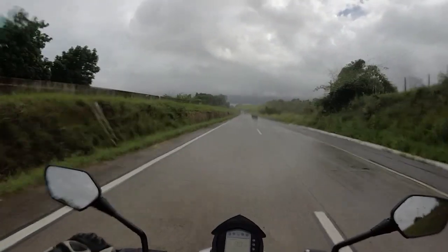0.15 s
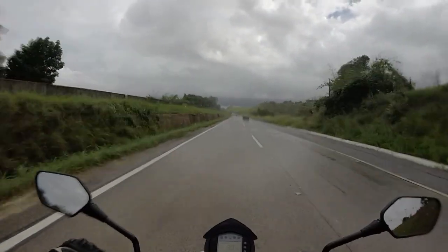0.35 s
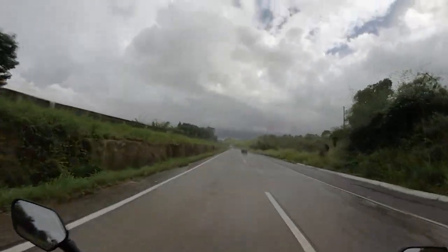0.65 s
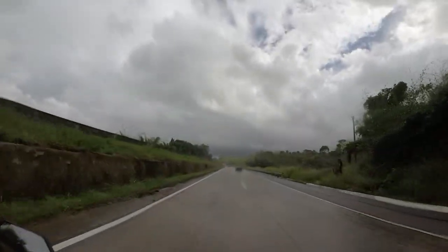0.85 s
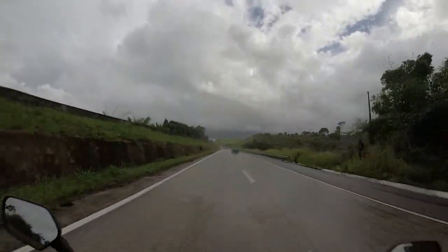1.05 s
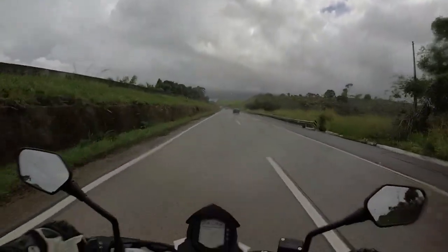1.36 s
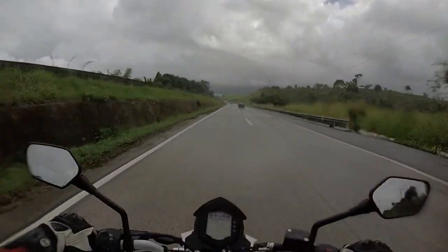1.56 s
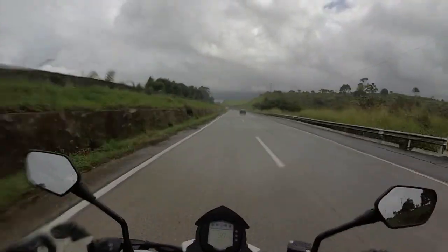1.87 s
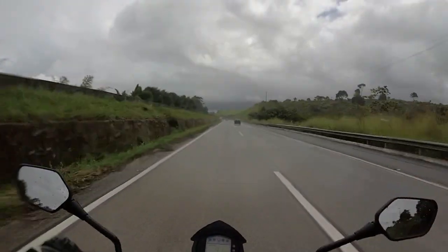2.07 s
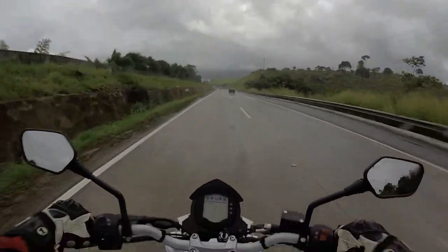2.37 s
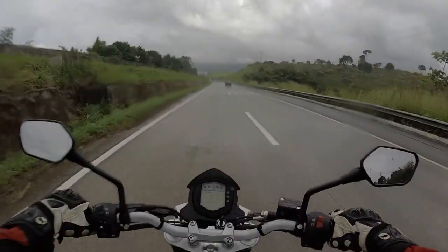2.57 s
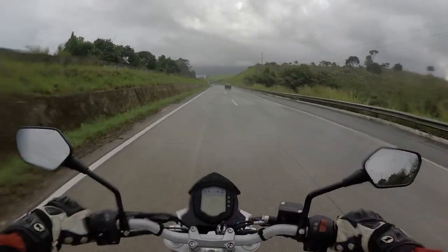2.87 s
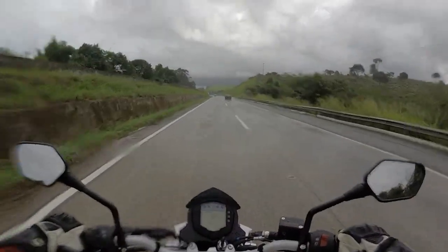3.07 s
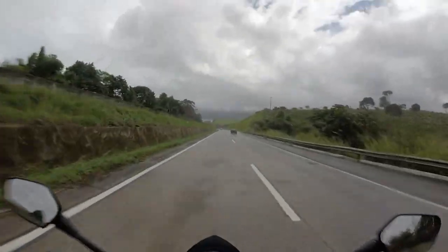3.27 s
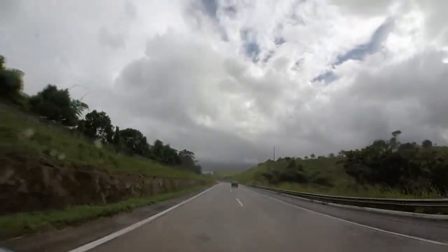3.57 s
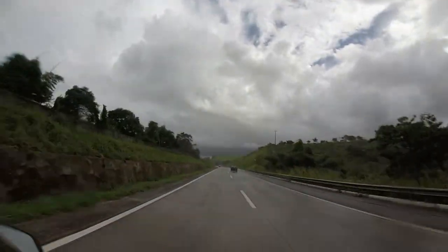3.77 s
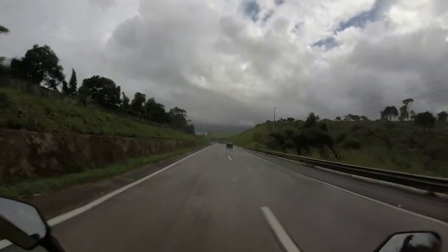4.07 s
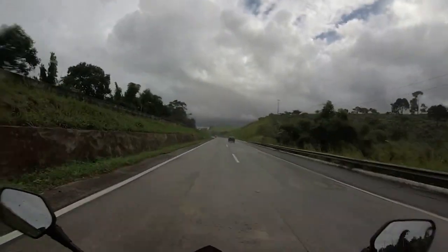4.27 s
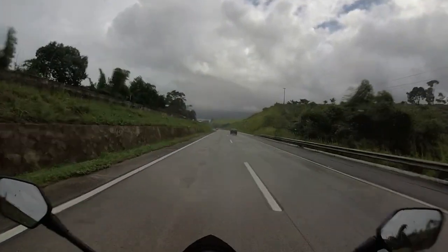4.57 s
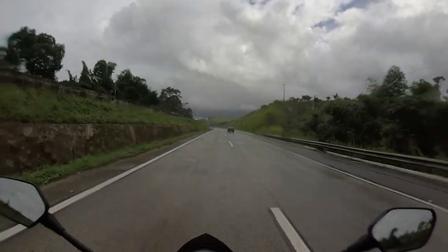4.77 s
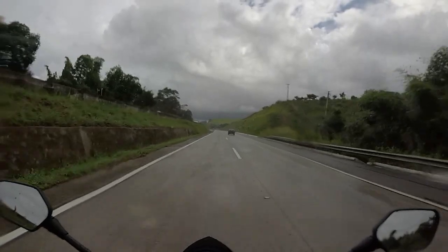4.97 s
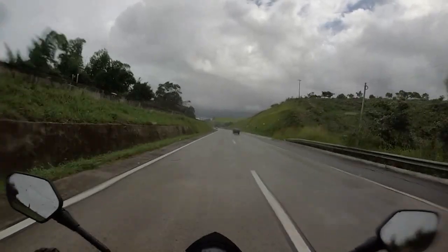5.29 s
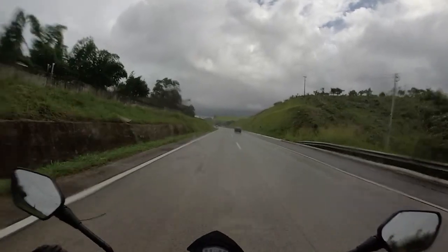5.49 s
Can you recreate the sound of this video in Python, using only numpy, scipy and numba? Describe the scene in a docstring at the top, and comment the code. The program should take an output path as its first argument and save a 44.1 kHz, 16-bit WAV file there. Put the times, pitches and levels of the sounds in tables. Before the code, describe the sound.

On an open road in rain, a helmet-mounted microphone inside a plastic shell catches irregular clicks, tiny splashes and occasional blunt knocks. Wind buffets in low, uneven gusts with a muffled hiss, while a very faint, wavering mid-pitched engine whine stays behind. The pattering continues to the end, with loud peaks briefly ducking everything.

```python
"""On a fast road in the rain, a camera in a plastic case rides on a motorcyclist's helmet.
Raindrops tick on the case and set its modes ringing; the hardest ones add a dull thump.
Wind makes a low rumble of shaped noise and a muffled hiss by shaking the same modes.
A faint engine whine is a wavering sine, and a limiter ducks the sound after loud peaks."""
import sys
import numpy as np
from scipy import signal
from scipy.fft import rfft, irfft, next_fast_len
from scipy.io import wavfile
from scipy.ndimage import uniform_filter1d
from numba import njit

SR = 44100
rng = np.random.default_rng(int(sys.argv[2]) if len(sys.argv) > 2 else 0)


def unload_audio(sound):
    """Save the sound as a 16-bit wav file, at the path given as the first command line argument."""
    columns = np.transpose(np.atleast_2d(sound))
    # keep every value between -1 and 1, then stretch to whole-number steps
    steps = np.round(np.clip(columns, -1, 1) * 32767)
    wavfile.write(sys.argv[1], SR, steps.astype(np.int16))


N = 248283  # length in samples

# Strength of the wind over time: start_s, wind_db
WIND_GUSTS = [(0.0, -33), (0.25, -39.5), (0.5, -36.5), (0.77, -40), (1.02, -35), (1.3, -30.5),
              (1.44, -36.5), (1.77, -40), (1.98, -36), (2.25, -41), (2.42, -30.5), (2.59, -32.5),
              (2.8, -44), (2.98, -32.5), (3.38, -26.5), (3.74, -40), (4.09, -39), (4.37, -31.5),
              (4.83, -37.5), (5.1, -33), (5.63, -35.5)]
# Tone of the wind rumble, relative levels: pitch_hz, level_db (per Hz)
RUMBLE_TONE = [(12, -38), (24, -3), (40, -5), (60, -8), (119, 2.5), (224, -10.5), (368, -22), (527, -19),
               (574, -16), (837, -26.5), (1200, -39.5), (1560, -29), (2640, -120)]
# Knocks from the few drops that jolt the whole camera: start_s, level_db
CAMERA_THUDS = [(1.396, -10), (1.587, -22), (2.623, -9), (3.468, -17), (3.5985, -15), (4.2388, -10),
                (4.6528, -21), (4.7971, -23)]
# Large raindrops; the pitch stands for where a drop lands, which decides the modes that ring most:
# start_s, level_db, pitch_hz
LARGE_DROPS = [(0.0314, -7.5, 4500), (0.04, -4.5, 4300), (0.0513, -2, 4060), (0.2009, -11.5, 2620),
               (0.2329, -7, 5620), (0.2778, -17.5, 4430), (0.3468, -12.5, 2260), (0.3905, -6.5, 5650),
               (0.4845, -8, 2900), (0.5217, -13, 4240), (0.5653, -12.5, 6700), (0.618, -7, 4380),
               (0.6357, -5.5, 4320), (0.6934, -17, 5900), (0.7117, -15.5, 6600), (0.7711, -8, 1780),
               (0.791, -8.5, 5530), (0.8044, -12.5, 4270), (0.8297, -18, 1790), (0.8341, -13, 4540),
               (0.8723, -16.5, 5640), (0.8877, -14, 1900), (0.9175, -13, 4240), (0.9979, -13.5, 4400),
               (1.0407, -12.5, 5800), (1.1615, -22.5, 1860), (1.177, -7.5, 5900), (1.2067, -16.5, 6040),
               (1.2233, -15.5, 2840), (1.2664, -18, 6480), (1.2831, -18, 1800), (1.294, -11.5, 2860),
               (1.3808, -15.5, 1840), (1.3955, -1, 4230), (1.4885, -15.5, 4320), (1.5026, -8, 4330),
               (1.511, -30, 7860), (1.5191, -13, 5500), (1.525, -8, 4400), (1.5437, -12, 6470),
               (1.6538, -17, 2780), (1.6666, -13, 4170), (1.6854, -7.5, 4280), (1.7546, -11, 5900),
               (1.7913, -12.5, 2800), (1.8095, -13.5, 5600), (1.8511, -17, 1750), (1.8787, -18, 3220),
               (1.9017, -6.5, 4280), (1.9487, -6.5, 1720), (2.0066, -7, 4300), (2.027, -9.5, 4300),
               (2.0841, -18.5, 5630), (2.3462, -5, 6540), (2.3704, -19.5, 4620), (2.3908, -20, 6560),
               (2.4495, -11.5, 3080), (2.4987, -17.5, 5770), (2.516, -15, 2870), (2.585, -16.5, 5860),
               (2.5975, -6, 3370), (2.6227, -2, 4330), (2.8061, -14.5, 6480), (2.9013, -15, 5930),
               (2.9363, -15, 4270), (3.0542, -11, 4250), (3.144, -17, 2240), (3.1639, -12, 3350),
               (3.2352, -12.5, 3180), (3.3017, -16, 5960), (3.3947, -2.5, 4320), (3.4683, -5, 1660),
               (3.5, -5.5, 4280), (3.5896, -13.5, 5800), (3.5986, -7.5, 4340), (3.6141, -15, 5860),
               (3.6367, -18, 1800), (3.6506, -14.5, 1780), (3.6717, -6, 2160), (3.6882, -15.5, 1810),
               (3.6996, -13, 6050), (3.7537, -10.5, 4260), (3.7854, -17, 4100), (3.8085, -12, 2310),
               (3.8235, -14, 1760), (3.8539, -11.5, 4300), (3.8931, -14, 4660), (4.0647, -22, 2840),
               (4.0945, -13.5, 5800), (4.0998, -10.5, 1690), (4.1294, -13, 6700), (4.1416, -16, 5000),
               (4.1676, -12, 1770), (4.2388, -11, 3150), (4.2437, -10.5, 2580), (4.3038, -13, 4230),
               (4.3161, -9.5, 1700), (4.3967, -7.5, 4620), (4.4078, -15, 1800), (4.4191, -2.5, 4370),
               (4.4493, -12.5, 4260), (4.4691, -10, 4460), (4.5017, -15, 6040), (4.5629, -7.5, 2860),
               (4.6319, -7, 5270), (4.6526, -6.5, 4320), (4.6947, -14.5, 1760), (4.7971, -5.5, 5570),
               (4.8117, -16, 3280), (4.8289, -12.5, 5530), (4.8713, -9, 4380), (4.9846, -10.5, 5840),
               (5.0075, -14, 5850), (5.0368, -12, 2200), (5.0521, -10.5, 4300), (5.2036, -15, 2730),
               (5.2138, -8, 2600), (5.2301, -15, 4100), (5.2362, -3, 4270), (5.2402, -6, 2290),
               (5.2536, -14, 5450), (5.2608, -13, 5400), (5.2708, -5.5, 4150), (5.2847, -14, 5300),
               (5.3812, -19, 2840), (5.3895, -13, 1810), (5.4237, -10.5, 5670), (5.4274, -10.5, 5800)]
# Modes of the plastic case, with ring time down to -60 dB and relative levels:
# pitch_hz, ring_s, drop_level_db, wind_level_db
CASE_MODES = [(1420, 0.017, -5.5, 2.5), (1874, 0.012, 1.5, 7), (2274, 0.017, -2.5, 1),
              (2900, 0.0088, 2, 6.5), (3220, 0.019, -8.5, -10), (3933, 0.0043, 5, -16),
              (4605, 0.0061, 3, -7.5), (5536, 0.0059, 1.5, -2.5), (5960, 0.011, -1.5, -7),
              (6460, 0.0027, 6, -11.5), (7980, 0.0056, -1.5, -24), (8730, 0.0051, 0.5, -19),
              (10500, 0.0027, 4.5, -21), (11700, 0.0037, 0.5, -32), (13200, 0.0026, 1, -20),
              (14600, 0.0055, -6.5, -34)]

CALM_DB = -35  # usual wind level, on the scale of the gust table
WHINE_HZ, WHINE_DB = 576, -59  # middle pitch and level of the engine whine
THUD_HZ, THUD_RING_S = 1000, 0.0022
SMALL_DROPS_PER_S = 180
TOP_HZ = 16400  # highest pitch that the recorder keeps


def undb(db):
    """Turn decibels into a plain multiplier."""
    return 10 ** (np.asarray(db) / 20)


def level(x, db):
    """Scale a sound so that its average (RMS) level is db."""
    return x * undb(db) / np.sqrt(np.mean(x ** 2))


def ring(x, hz, t60):
    """One mode struck or shaken by x: a sine that fades by 60 dB in t60 seconds."""
    pole = np.exp(2j * np.pi * hz / SR - np.log(1000) / (t60 * SR))
    return signal.lfilter([1], [1, -pole], x).imag


def walk(rate):
    """Smooth random wandering: rate new values a second, averaged twice, with a spread near 1."""
    hold = int(SR / rate)
    steps = np.repeat(rng.standard_normal(N // hold + 1), hold)
    smooth = uniform_filter1d(uniform_filter1d(steps, hold), hold)
    return 1.306 * smooth[:N]


def gust():
    """Wind strength in dB above its usual level, joined by straight lines between table points."""
    start_s, wind_db = np.transpose(WIND_GUSTS)
    return np.interp(np.arange(N) / SR, start_s, wind_db) - CALM_DB


def engine():
    """A thin gear whine: a sine whose pitch and level waver slightly."""
    pitch_hz = WHINE_HZ * (1 + 0.0058 * walk(4.7))
    phase = 2 * np.pi * np.cumsum(pitch_hz) / SR
    return np.sqrt(2) * undb(WHINE_DB + 0.71 * walk(5.8)) * np.sin(phase)


def rumble():
    """Turbulent air on the helmet: overlapping noise bands that swell together and flicker alone."""
    size = next_fast_len(N)
    hz = np.fft.rfftfreq(size, 1 / SR) + 1  # the 1 avoids the log of zero
    tone_hz, tone_db = np.transpose(RUMBLE_TONE)
    colour = undb(np.interp(np.log(hz), np.log(tone_hz), tone_db))
    out, swell = 0, walk(16)
    for centre in 16 * 2 ** (np.arange(14) / 2):  # Hz, half an octave apart
        band = np.cos(np.pi / 2 * np.clip(2 * np.log2(hz / centre), -1, 1))
        noise = irfft(rfft(rng.standard_normal(size)) * band * colour, size)[:N]
        share = np.clip(1.1 - 0.16 * np.log2(centre / 100), 0, 1)  # gusts move the bass most
        out = out + noise * undb(share * gust() + 0.5 * swell + 0.61 * walk(12))
    return level(out, -33.5)


def thuds():
    """A short, dull knock of the whole camera on its mount: one mode that dies at once."""
    start_s, level_db = np.transpose(CAMERA_THUDS)
    knocks = np.bincount((start_s * SR).astype(int), undb(level_db), N)
    return ring(knocks, THUD_HZ, THUD_RING_S)


def small_drops(low_db, top_db, low_hz, top_hz, driven):
    """Fine rain and spray landing at random on the case; gusts drive it harder."""
    when, size, place = rng.random((int(SMALL_DROPS_PER_S * N / SR), 3)).T
    level_db = low_db + (top_db - low_db) * size ** 1.75  # most drops are weak
    level_db = level_db + driven * gust()[(when * N).astype(int)]
    pitch_hz = low_hz * (top_hz / low_hz) ** place
    return np.column_stack([when * N / SR, level_db, pitch_hz])


def case(drops, splash_s, splash_db, scatter_db, far_db, over_db, under_db, octaves, count=4):
    """Each drop strikes, then splashes in weaker pats that ring the case; wind shakes the same modes."""
    start_s, level_db, pitch_hz = drops.T
    late = rng.random((len(drops), count)) * splash_s
    late[:, 0] = 0
    pats = rng.standard_normal((len(drops), count)) * undb(splash_db)
    pats[:, 0] = 1  # the first pat is the strike itself
    at = np.minimum(((start_s[:, None] + late) * SR).astype(int), N - 1).ravel()

    ticks, hiss, swell = 0, 0, walk(4.7)
    for k, (hz, t60, drop_db, wind_db) in enumerate(CASE_MODES):
        apart = np.log2(hz / pitch_hz)  # octaves from the drop's own pitch
        near = np.exp(-(apart / octaves) ** 2)
        slope = np.where(apart > 0, over_db, -under_db)  # dB per octave
        db = level_db + drop_db + slope * apart
        db = db + (1 - near) * (far_db + scatter_db * (rng.random(len(drops)) - 0.5))
        hits = np.bincount(at, (undb(db)[:, None] * pats).ravel(), N)
        # neighbouring modes start opposed, so the ring swells before it dies
        ticks = ticks + (-1) ** k * ring(hits, hz, t60)

        shake = rng.standard_normal(N) * undb(1.75 * swell + 2.23 * walk(24.66))
        muffled = ring(ring(shake, hz, 0.33 * t60), hz, 0.33 * t60)
        hiss = hiss + level(muffled, wind_db)
    sound = ticks + level(hiss, -39) * undb(0.72 * gust())
    # the rain on the case keeps little sound below about 1100 Hz
    return signal.sosfilt(signal.butter(2, 1100, "high", fs=SR, output="sos"), sound)


def scene():
    """Add up the engine, the wind, the knocks and the rain on the case."""
    fine_rain = small_drops(low_db=-51.5, top_db=-16.5, low_hz=1350, top_hz=7700, driven=0.29)
    drops = np.vstack([LARGE_DROPS, fine_rain])
    shell = case(drops, splash_s=0.0017, splash_db=-14.0, scatter_db=16.5, far_db=-10.5,
                 over_db=-2, under_db=-4.0, octaves=0.25)
    return (shell + thuds() + rumble() + engine())[None]


@njit
def peak_follow(x, attack, release):
    """Loudness curve that jumps up on peaks and sinks slowly; steps are shares per sample."""
    out, e = np.empty(len(x)), 0.
    for i in range(len(x)):
        e += (abs(x[i]) - e) * (attack if abs(x[i]) > e else release)
        out[i] = e
    return out


def record(dry):
    """Hard ticks push the microphone capsule to one side; a limiter ducks peaks; the top is cut."""
    # squaring turns a hard tick into a one-sided push, heard as a dull thump
    thump_band = signal.butter(2, [250, 1200], "band", fs=SR, output="sos")
    capsule = dry + 0.14 * signal.sosfilt(thump_band, dry ** 2)

    attack_s, release_s = 0.0011, 0.08
    peak = peak_follow(capsule[0], 1 / (attack_s * SR), 1 / (release_s * SR))
    gain = np.minimum(1, (0.24 / (peak + 1e-9)) ** 0.68)  # ducks only above 0.24

    kept_band = signal.butter(2, [27, 14500], "band", fs=SR, output="sos")
    limited = signal.sosfilt(kept_band, capsule * gain)
    rounded = 0.94 * np.tanh(1.122 * limited)  # bends the highest peaks over softly
    return signal.sosfilt(signal.ellip(10, 0.2, 70, TOP_HZ, fs=SR, output="sos"), rounded)


dry = scene()
out = record(dry)
unload_audio(out)
```